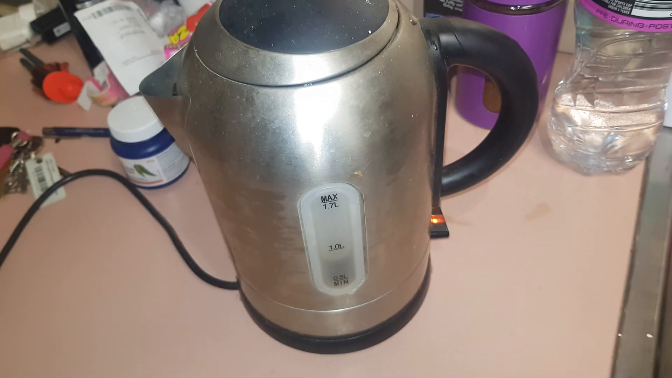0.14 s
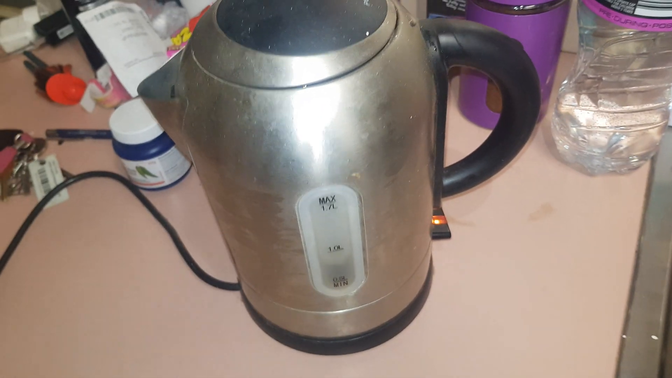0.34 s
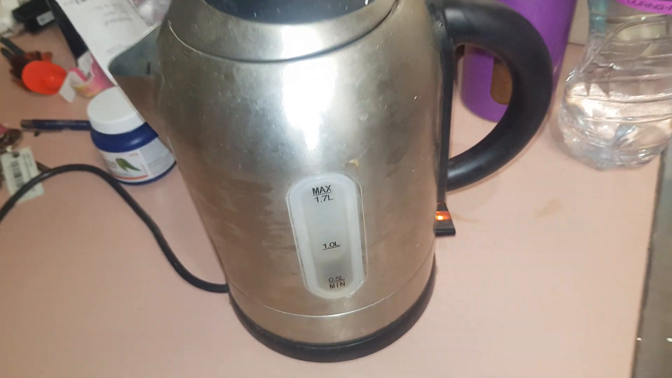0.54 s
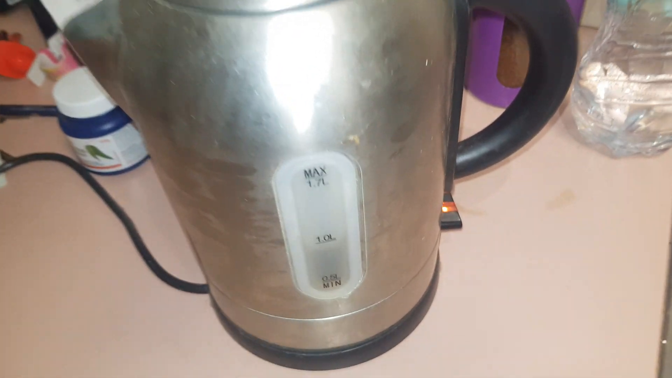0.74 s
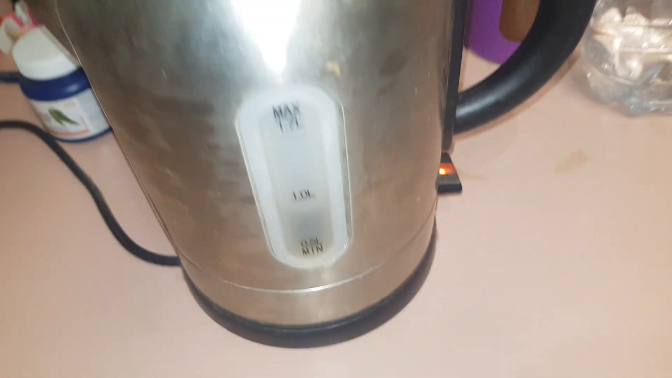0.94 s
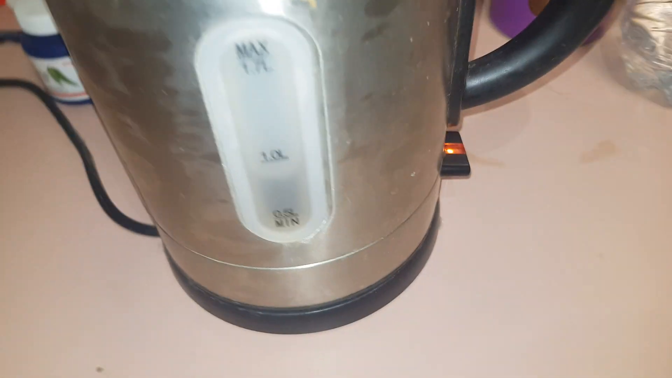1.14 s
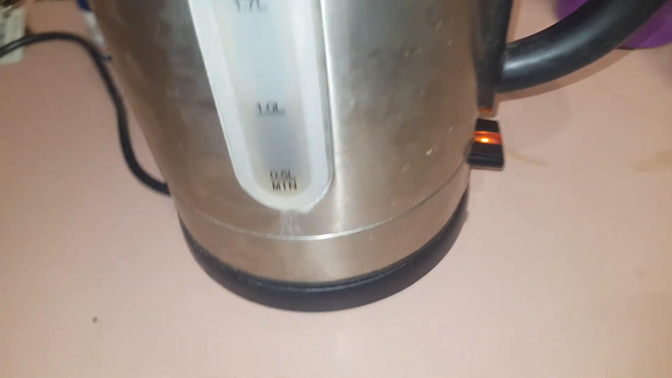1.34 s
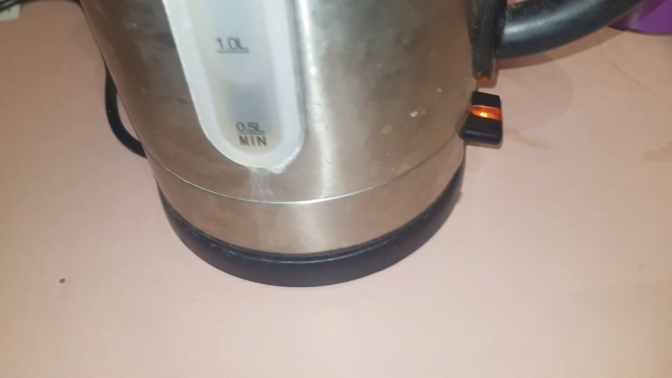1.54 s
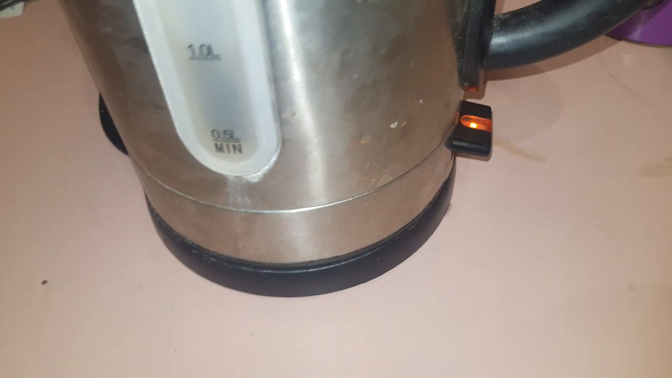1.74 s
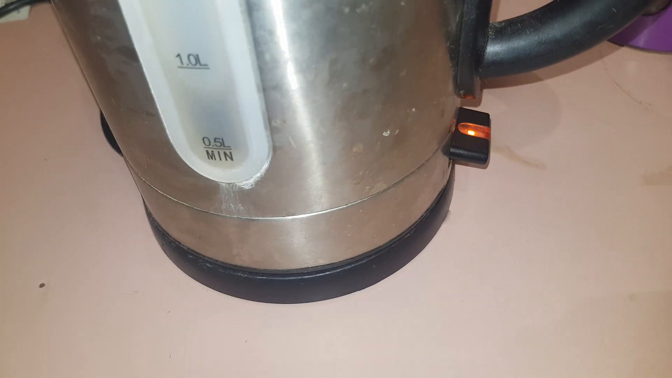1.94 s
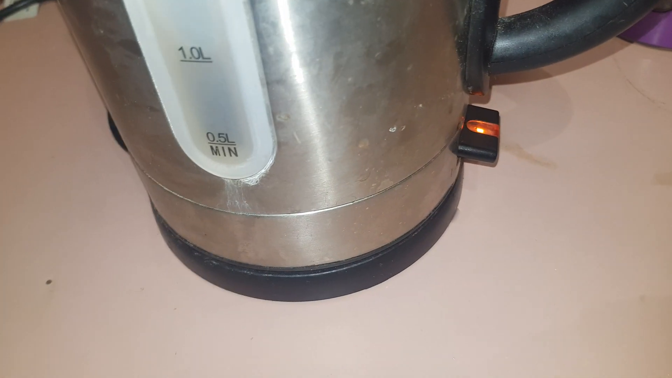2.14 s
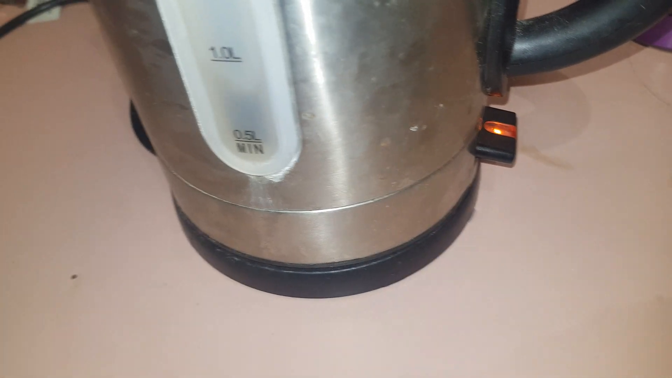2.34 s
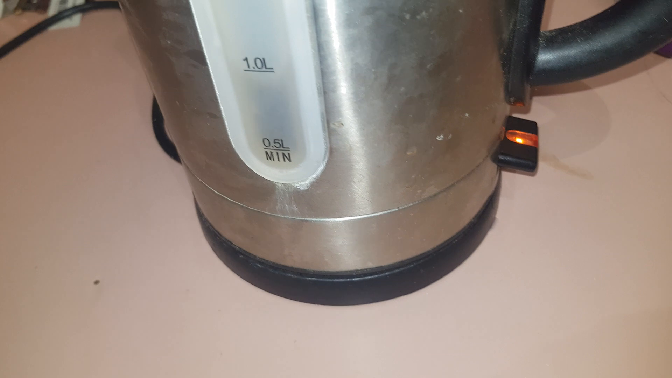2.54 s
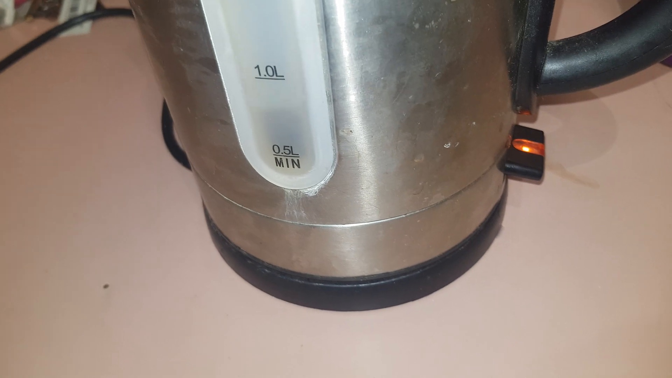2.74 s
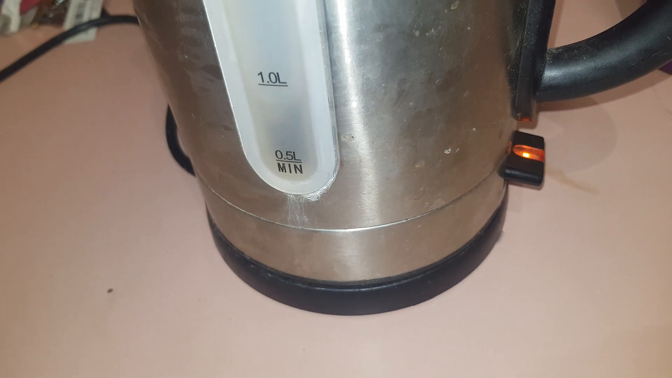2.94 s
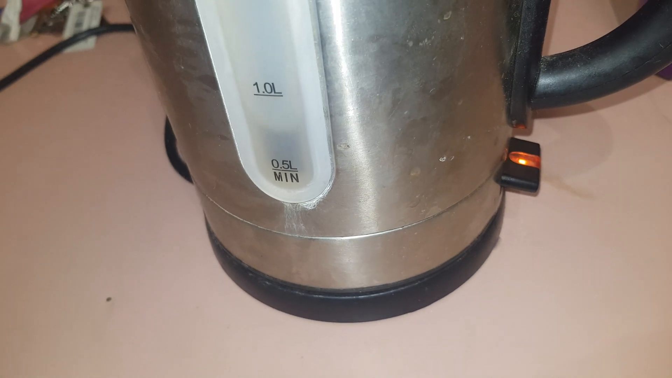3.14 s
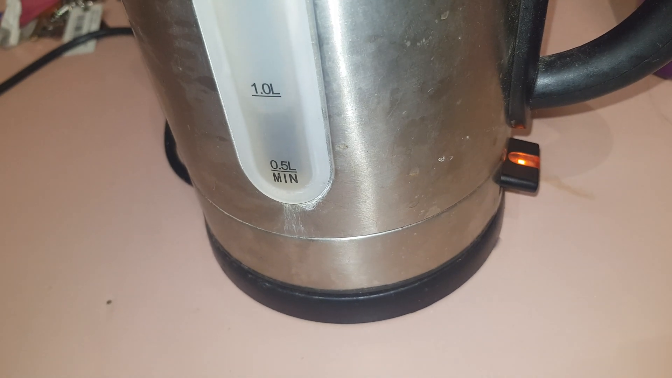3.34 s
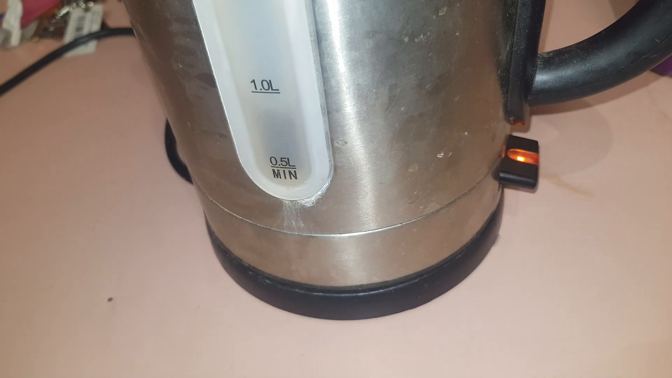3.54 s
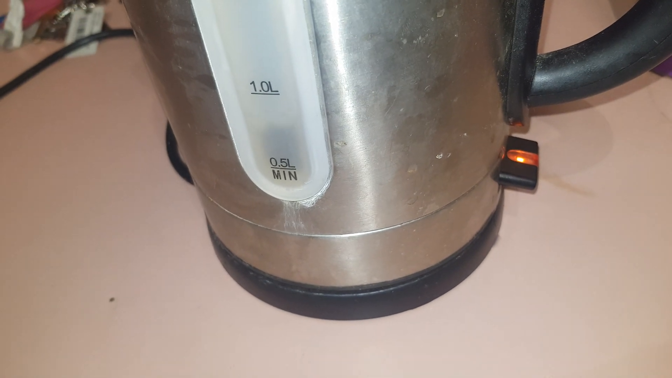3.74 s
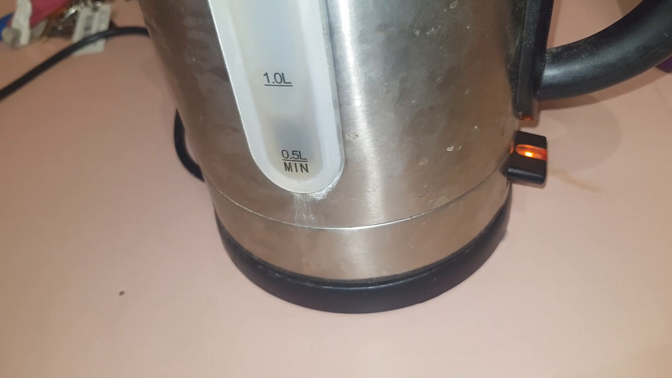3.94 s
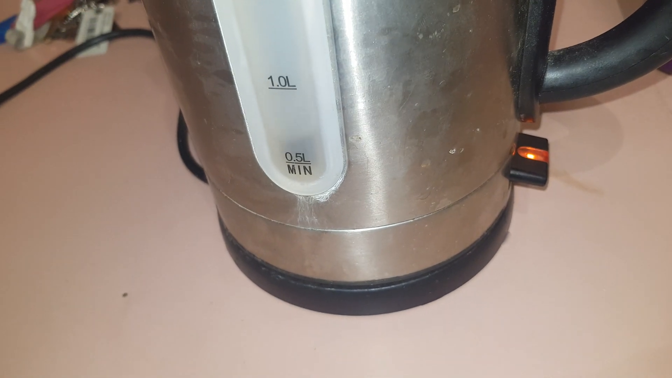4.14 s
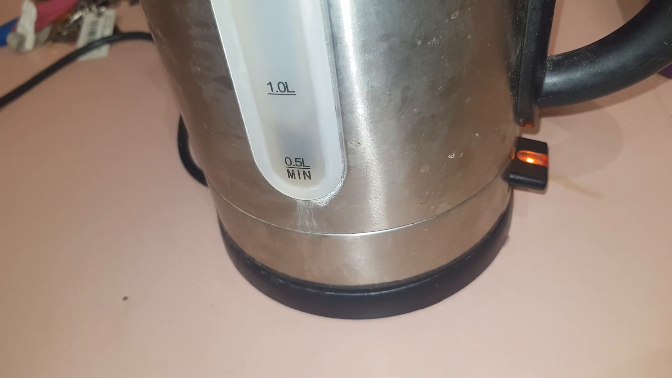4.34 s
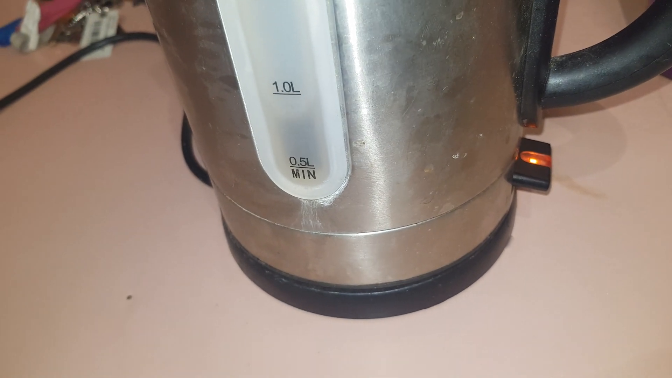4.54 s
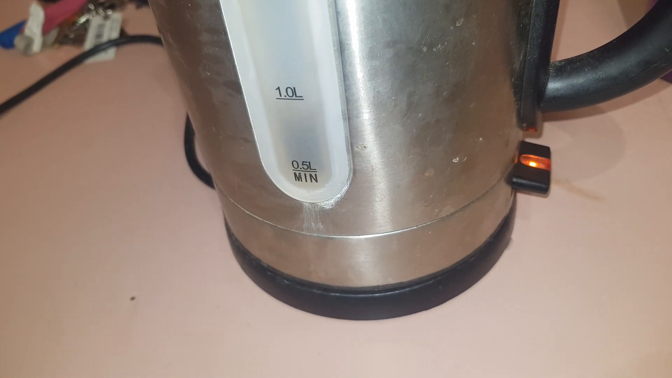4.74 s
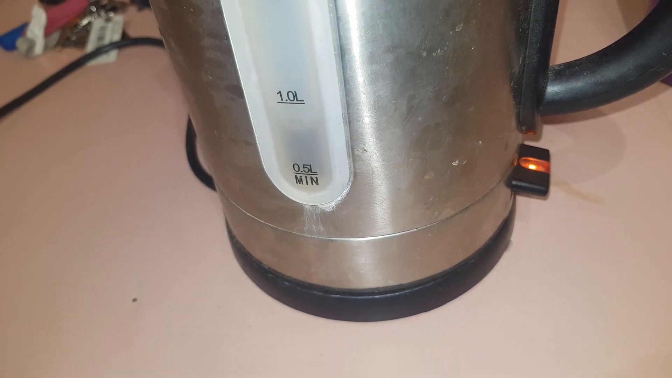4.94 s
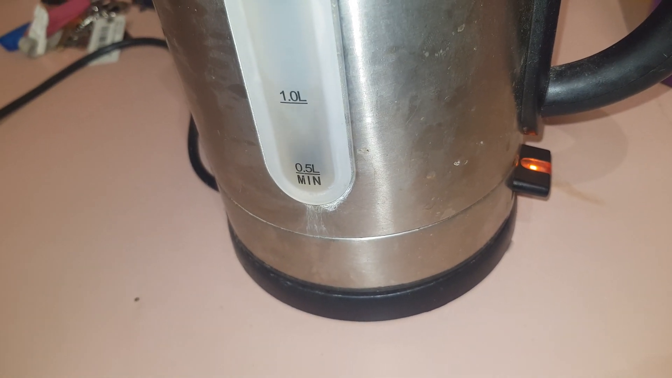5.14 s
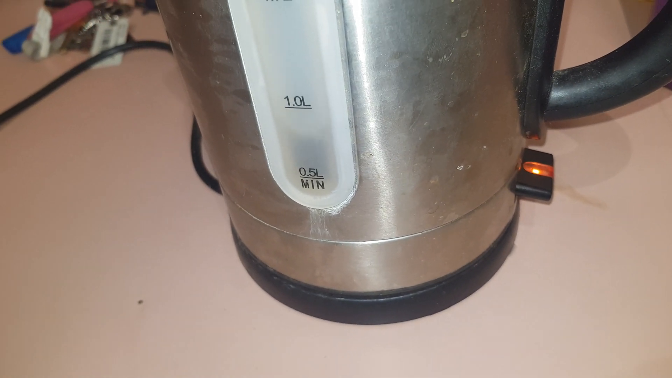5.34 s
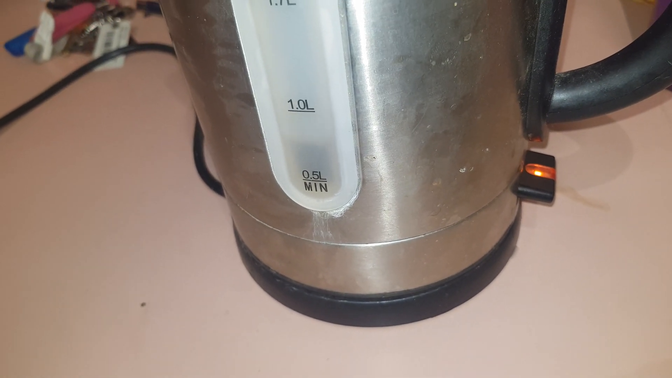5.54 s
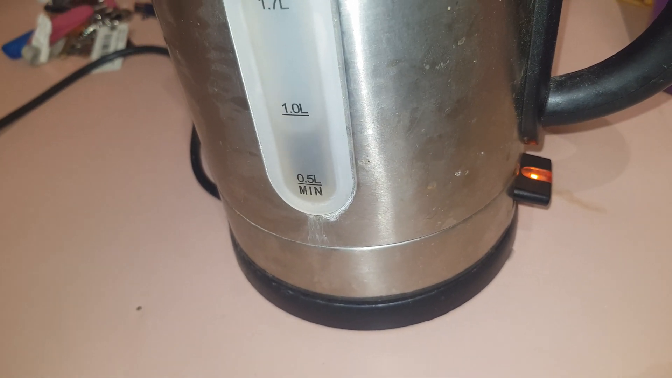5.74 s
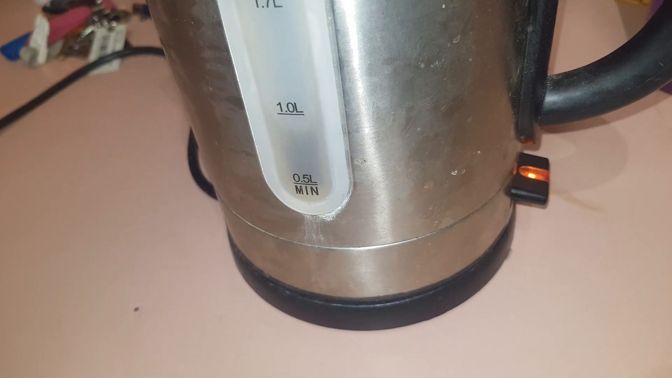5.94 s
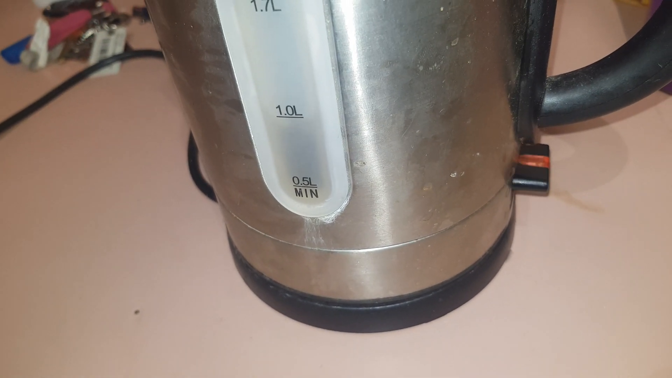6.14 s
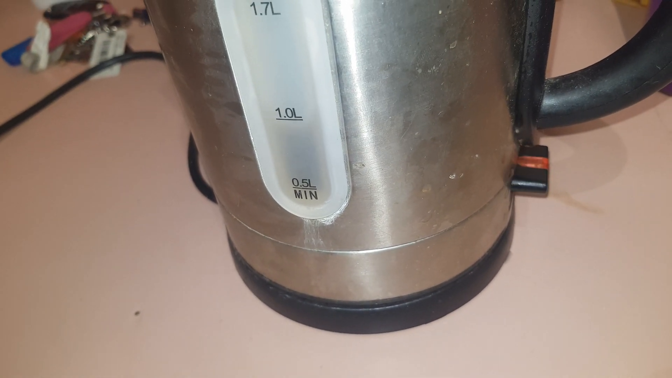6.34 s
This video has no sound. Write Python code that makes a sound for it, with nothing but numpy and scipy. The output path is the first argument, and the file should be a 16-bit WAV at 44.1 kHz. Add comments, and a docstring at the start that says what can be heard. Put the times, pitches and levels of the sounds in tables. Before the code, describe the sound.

In a small kitchen, a steel electric kettle is at a full rolling boil. A low, uneven rumble heaves under wet glugs, gurgles, fine crackle and bubble knocks on the metal wall, with a thin steady steam hiss. The microphone moves in close early on, bringing out the drumming of the wall. Near the end the switch snaps off loudly with a dull thud and brief metallic ring, while the bubbling continues.

```python
"""A small kitchen: a steel electric kettle at a rolling boil on the counter; the microphone soon moves in close.
Vapour bubbles, as random kicks through resonances, heave the water and drum on the body.
Chirped sines gurgle and glug, short noises crackle and knock on the wall, shaped noise is the steam.
Near the end the thermostat snaps the switch off: hard contacts, a lever ring, a thud, a brief shell ring.
A tail of dying noise is the kitchen's answer; two microphone ports hear it all."""
import sys
import numpy as np
from scipy import signal
from scipy.fft import rfft, irfft, next_fast_len
from scipy.io import wavfile
from scipy.ndimage import map_coordinates

SR = 44100
rng = np.random.default_rng(int(sys.argv[2]) if len(sys.argv) > 2 else 0)


def put_to_file(sound):
    """Save the sound as 16-bit audio at rate SR, in the file named by the first command-line argument."""
    columns = np.atleast_2d(sound).T  # one column per channel
    safe = np.clip(columns, -1, 1)
    whole_steps = np.round(safe * 32767)
    wavfile.write(sys.argv[1], SR, whole_steps.astype(np.int16))


N = 285768

# Colours give a relative spectrum: only their shape counts. Event levels are before colour, room and ports.
# kitchen, decay of the tail: (f/Hz, t60/s)
ROOM_DECAY = [(150, 0.055), (1000, 0.61), (2500, 0.44), (6000, 0.6), (15000, 0.18)]
# ports, likeness of left and right, held within -1 to 1: (f/Hz, likeness)
KETTLE_LIKENESS = [(90, 1.5), (260, 0.67), (520, 2), (800, 0.5), (1450, 0.5), (1900, 0), (2400, 0.32),
                   (4000, -0.06), (15000, 0)]
SWITCH_LIKENESS = [(200, 0.71), (700, 0.77), (1400, 0), (2300, 0.16), (4000, 0), (7000, 0)]
# ports, left minus right: (f/Hz, level/dB)
KETTLE_BALANCE = [(60, 9.5), (180, 7.5), (350, 10), (450, 10), (540, 12.5), (750, 6), (1100, 6.5),
                  (1600, 6), (2200, -2), (3000, 5.5), (3800, 1), (5500, 5.5), (7500, 13.5), (9000, 0.5),
                  (11000, 1), (14000, 7.5)]
SWITCH_SIDE_BALANCE = [(200, 6), (700, 11.5), (1300, 5), (2200, 0.5), (3200, 1), (4200, -1), (7200, 12),
                       (9000, 1), (14000, 4)]

# colour of the thin steam: (f/Hz, level/dB)
STEAM_COLOUR = [(100, 6), (1000, 11), (2500, 8), (4000, 5), (5500, -2), (7200, -5), (8500, -4), (11000, 2),
                (13000, -3), (15500, -7)]
# puffs of steam from the spout: (peak t/s, length/s, level/dB)
STEAM_PUFFS = [(.69, .5, -54.3), (1.017, 0.32, -55.3), (1.22, 0.42, -53.8)]
# colour of the puffs: (f/Hz, level/dB)
PUFF_COLOUR = [(1500, -14), (4500, 1.5), (7500, -1.5), (11000, 3), (14500, 0), (15800, 7.5)]
# thin ticks of the hot casing: (t/s, level/dB)
CASING_TICKS = [(0.4444, -40.5), (1.0502, -35.5), (2.1044, -32), (2.3101, -39), (2.5162, -45),
                (2.8844, -40), (3.3169, -43), (4.1965, -42.5), (5.503, -42), (5.5638, -39), (5.6111, -39)]
# colour of the ticks: (f/Hz, level/dB)
TICK_COLOUR = [(500, -4), (2500, 4), (5000, 2.5), (8000, 0.5), (11000, 4), (15500, -6)]

# the switch lets go, hits its stop and rattles: (t/s, level/dB, treble re that/dB, lever ring/dB)
SWITCH_CONTACTS = [(6.1113, -19, 2, -32), (6.1139, -14, -3, -28), (6.1222, -10, -2.5, -12),
                   (6.1243, -11.5, -1.5, -12.5), (6.127, -15.5, 0, -27), (6.1468, -22.5, -7, -21),
                   (6.1565, -28, -4, -30)]
# colour of the snap: (f/Hz, level/dB)
SNAP_COLOUR = [(80, -11), (300, -9.5), (500, -4), (700, 0), (980, -6), (1250, -1), (1520, 1.5),
               (1750, -1.5), (2000, 0.5), (2300, 6.5), (2600, 2.5), (2950, -2), (3300, -6), (4100, -3),
               (4800, -8), (5500, -13), (6400, -15), (7050, -10), (7600, -11.5), (10000, -10), (11400, -4),
               (13300, -9.5), (15300, -9), (15900, -22)]
# colour of the thud: (f/Hz, level/dB)
THUD_COLOUR = [(50, -6), (90, 9.5), (200, -20), (330, 2), (550, -6.5), (900, -18), (2500, -60)]
# short, hard ring of the plastic lever: (f/Hz, level/dB, t60/s)
LEVER_MODES = [(2290, -1.5, .012), (3240, -11, .01), (3850, -6, .009), (7070, -17, .02), (11300, -18, .016)]
# ring of the steel shell: (f/Hz, level/dB, t60/s)
SHELL_MODES = [(442, -35.5, .35), (729, -34, .3), (890, -39, .2), (1290, -38, .18), (1455, -31, 0.19),
               (1735, -36, 0.22), (2120, -33, .17), (2200, -30.5, .19), (2380, -35, .25), (2460, -37, .25),
               (3160, -40, .22), (3256, -38, .17)]

# strength of the boil about its usual; each layer takes a share of it: (t/s, level/dB)
BOIL_STRENGTH = [(0, -2), (1.0, -1.5), (1.3, 0.5), (1.9, -0.5), (2.95, 2.5), (3.12, -1.5), (3.45, 4.5),
                 (3.85, -0.5), (4.45, 2.5), (4.8, -4.5), (5.1, 0), (5.6, -2), (6.48, -2)]
# colour of the crackle: (f/Hz, level/dB)
CRACKLE_COLOUR = [(300, -26), (700, 3.5), (1150, -3), (1480, -3), (1950, -2.5), (2300, 1.5), (2800, -13),
                  (3800, -27), (5000, -19), (7200, -56), (9000, -25), (15500, -22)]
# the wall's ring in the crackle, heard only up close: (f/Hz, width/Hz, level/dB)
CLOSE_WALL_MODE = [(1500, 430, -2.5)]
# colour of the sparse, brighter spits: (f/Hz, level/dB)
SPIT_COLOUR = [(800, -6.5), (2400, 9.5), (4000, 3.5), (5500, -9.0), (7300, -7.5), (9000, -9), (15000, -7.5)]
# big bubbles bursting on the wall: (t/s, level/dB, f/Hz, sharp edge re that/dB)
WALL_POPS = [(0.3254, -39, 2420, -7), (0.572, -39, 2300, -26), (0.588, -39, 2900, -24),
             (1.066, -37, 1490, -26), (1.259, -37.5, 1450, -31), (1.3743, -33.5, 2330, -15),
             (1.4293, -46, 1440, -30), (1.483, -39, 2300, -32), (1.54, -39, 1900, -30),
             (1.578, -41, 1350, -30), (1.609, -41, 1700, -28), (1.647, -36, 1490, -18),
             (1.7683, -33, 3120, -12), (1.802, -44, 3200, -8), (1.948, -37, 2480, -26),
             (2.074, -35, 1300, -14), (2.2712, -40, 1470, -26), (2.294, -29, 1310, -26),
             (2.3386, -43, 2330, -28), (2.3527, -31.5, 2320, -30), (2.385, -38, 1500, -28),
             (2.565, -33.5, 2250, -16), (2.7583, -38, 1730, -26), (2.7893, -36, 1190, -14),
             (2.9996, -36.5, 1420, -12), (3.044, -33, 2190, -31), (3.123, -37, 1640, -10),
             (3.2814, -36, 1690, -8), (3.316, -35, 1620, -22), (3.753, -35, 1500, -26),
             (3.8144, -31, 3040, -12), (3.872, -35, 2300, -28), (3.902, -36.5, 2380, -24),
             (3.91, -35.5, 2750, -24), (4.0771, -38, 1710, -26), (4.197, -31.5, 1280, -19),
             (4.217, -40, 2600, -26), (4.233, -39, 2800, -22), (4.2488, -31.5, 2100, -28),
             (4.265, -35, 1400, -30), (4.337, -36.5, 2830, -3), (4.454, -31.5, 1710, -9.5),
             (4.615, -31.5, 2650, -18), (4.733, -33.5, 1880, -30), (4.762, -29, 1460, -36),
             (4.801, -32.5, 1800, -33), (4.8375, -35.5, 1780, -26), (4.9136, -35, 1700, -26),
             (4.9835, -35, 1510, -17), (5.002, -31, 2700, -18), (5.0062, -38, 1400, -4),
             (5.1026, -31, 1700, -25), (5.1413, -37, 1610, -6.5), (5.194, -36, 2200, -28),
             (5.232, -31.5, 1490, -31), (5.253, -36.5, 1500, -28), (5.3258, -34.5, 1600, -24),
             (5.371, -38, 1770, -30), (5.43, -35.5, 2500, -13), (5.56, -28.5, 1490, -25),
             (5.7884, -40, 1340, -26), (5.913, -37, 1410, -8), (6.0916, -39, 2370, -28),
             (6.327, -32, 2480, -15)]
# colour of a bubble's knock on the wall: (f/Hz, level/dB)
KNOCK_COLOUR = [(300, -33), (700, -7), (1100, 0), (1650, 4), (2000, -0.5), (2350, 2), (2900, -7),
                (4000, -13), (4800, -20), (7000, -36), (15000, -36)]
# colour of the sharp edges: (f/Hz, level/dB)
EDGE_COLOUR = [(1500, -4.0), (3800, -1), (5200, -10.0), (7300, -10), (8600, -21), (15000, -27)]
# colour of the gurgle and of the splashes: (f/Hz, level/dB)
GURGLE_COLOUR = [(150, -10.5), (300, -4.5), (540, -2.5), (660, -7.5), (850, -8), (1100, -12.5), (1600, -11),
                 (3000, -39.5)]
# large bubbles breaking the surface: (t/s, level/dB, starting f/Hz)
SURFACE_GLUGS = [(0.279, -38, 483), (0.671, -31.5, 560), (0.723, -35, 566), (1.315, -29.5, 495),
                 (1.583, -30, 236), (1.697, -25, 243), (2.004, -29.5, 529), (2.072, -35, 547),
                 (2.756, -33, 556), (2.9, -26, 240), (3.006, -23.5, 234), (3.437, -26.5, 246),
                 (3.815, -37, 564), (4.114, -23.5, 243), (4.318, -24.5, 260), (4.6, -26, 235),
                 (4.8, -31.5, 503), (4.894, -27, 490), (5.022, -25.5, 260), (5.166, -24, 266),
                 (5.669, -30.5, 550), (5.684, -26, 301), (6.033, -22, 259)]
# large pockets of vapour that rock the water: (peak t/s, level/dB, f/Hz)
VAPOUR_SURGES = [(0.03, -28.5, 143), (0.29, -29.5, 131.5), (0.429, -27.5, 133.3), (0.8, -34, 110),
                 (0.981, -31.5, 133.5), (1.189, -27, 133), (1.31, -24.5, 169.3), (1.51, -26.5, 168.8),
                 (1.7, -22.5, 176), (1.86, -30, 126.4), (2.051, -24, 137), (2.16, -28, 107.4),
                 (2.31, -26, 132), (2.53, -27.5, 123.8), (2.72, -29.0, 130.6), (2.84, -26, 113),
                 (2.989, -24, 175.2), (3.231, -29.0, 110), (3.5, -27, 130.5), (3.721, -28, 121),
                 (3.979, -22.5, 127.8), (4.191, -27.5, 170), (4.4, -23, 109.3), (4.53, -25, 175),
                 (5.021, -28, 135.5), (5.411, -33, 130.4), (5.5, -30.0, 166.4), (5.77, -31.0, 111),
                 (5.91, -26.5, 113.7), (6.019, -31, 132), (6.099, -30.5, 130.6), (6.31, -27.5, 175.8)]
# colour of the churn in a surge: (f/Hz, level/dB)
CHURN_COLOUR = [(60, -28), (105, 1.5), (180, -1.5), (280, -9.5), (450, -30), (1500, -76)]
# low resonances of the filled kettle on the counter: (f/Hz, width/Hz, level/dB)
BODY_MODES = [(61, 23.5, -5), (88.3, 16.5, -7.5), (112, 15.7, 0), (137.4, 13.2, 0.5), (175.3, 15.7, 1)]
# resonances of the water-loaded wall: (f/Hz, width/Hz, level/dB)
WALL_MODES = [(224.9, 17.7, 0.5), (278.4, 19.5, -1.5), (342, 27.6, -8.5), (456.7, 11.9, -5),
              (506, 50, -11.5), (567.3, 40.5, -10.5)]
# colours laid over the ringing body and the ringing wall: (f/Hz, level/dB)
HEAVE_COLOUR = [(20, -13), (36, -19.5), (50, -1), (180, -5.0), (260, -22.5), (1000, -34.5)]
DRUM_COLOUR = [(80, -14.0), (200, 0.0), (600, -3.5), (1000, 0.5), (3000, -38.5)]

TOP_HZ = 15850  # band limit of the recorder
APPROACH_START_S, APPROACH_S = 0.52, 0.94  # the microphone moves in: start and length
PING_S, PING_DB, PING_HZ = 0.047, -42, 1690
STOP_S = 6.1225  # the lever hits its stop
THUD_S, THUD_DB = 6.138, -22  # the kettle thuds on its base; level before colour and room
SURGE_S = 0.125  # length of one surge
GLUG_CYCLES = 18.2  # a large bubble falls 60 dB in this many cycles of its starting pitch


def amp(db):
    """Decibels to gain."""
    return 10 ** (np.asarray(db) / 20)


def unit(x):
    """Scale to rms 1."""
    return x / np.sqrt(np.mean(x ** 2) + 1e-20)


def along(points, hz):
    """Read (Hz, value) points on a log frequency axis."""
    f, v = np.transpose(points)
    return np.interp(np.log(hz + 1), np.log(f), v)


def wobble(rate):
    """A smooth random curve with rate knots a second."""
    knots = rng.standard_normal(int(N * rate / SR) + 4)
    return map_coordinates(knots, [np.arange(N) * rate / SR])


def add(track, s, sound):
    """Mix a sound into a track at time s."""
    part = track[..., round(s * SR):][..., :sound.shape[-1]]
    part += sound[..., :part.shape[-1]]


def filtered(x, response):
    """Multiply the spectrum of x by a complex response of frequency."""
    size = 2 * next_fast_len(N // 2 + SR // 4)
    return irfft(rfft(x, size) * response(np.fft.rfftfreq(size, 1 / SR)), size)[..., :N]


def coloured(x, points):
    """Causal filter with the given spectrum; white noise keeps its power."""
    def response(hz):
        cepstrum = irfft(np.log(unit(amp(along(points, hz)))))
        half = len(cepstrum) // 2
        # fold the cepstrum forward in time: minimum phase
        cepstrum[1:half] *= 2
        cepstrum[half + 1:] = 0
        return np.exp(rfft(cepstrum))
    return filtered(x, response)


def resonances(x, modes):
    """Ring x through a set of damped modes with alternating sign."""
    def response(f):
        total = 0
        for k, (centre, width, db) in enumerate(modes):
            damping = 1j * f * width
            total = total + (-1) ** k * amp(db) * damping / (centre * centre - f * f + damping)
        return total
    return filtered(x, response)


def burst(t60):
    """A pair of short dying noises: one contact, scattered by nearby surfaces."""
    t = np.arange(SR // 8) / SR
    return rng.standard_normal((2, len(t))) * amp(-60 * t / t60)


def contact(t60):
    """A pair of hard contacts: dying noises flattened to an even spectrum, then damped a little more."""
    noise = burst(t60)
    flat = irfft(np.exp(1j * np.angle(rfft(noise))))
    t = np.arange(flat.shape[1]) / SR
    return flat * np.linalg.norm(noise[0]) * amp(-20 * t / t60)


def impulses(rate, spread_db):
    """Random kicks, on average rate a second, of either sign and log-normal size, clipped at two spreads."""
    struck = rng.random(N) < rate / SR
    sign = rng.choice([-1, 1], N)
    size = amp(spread_db * np.clip(rng.standard_normal(N), -2, 2))
    return struck * sign * size


def blip(hz, rise, t60):
    """One ring at the two ports: a soft start, then a pitch that climbs at a steady rate set by rise."""
    t = np.arange(SR // 8) / SR
    phase = rng.uniform(0, 2 * np.pi, (2, 1))
    tone = np.sin(2 * np.pi * hz * t * (1 + rise * t / 2) + phase)
    return tone * amp(-60 * t / t60) * (1 - np.exp(-t / 0.00031))


def bubbles(count, centre_hz, cycles, rise, spread_db):
    """Each bubble rings for a few cycles and rises in pitch as it nears the surface."""
    start = rng.integers(0, N, (count, 1))
    pitch, size = np.clip(rng.standard_normal((count, 2)), -2, 2).T[:, :, None]
    hz = centre_hz * np.exp(.5 * pitch)
    n = np.arange(SR // 25)
    age = hz * n / SR / cycles  # 1 when the ring has fallen 60 dB
    tone = np.sin(2 * np.pi * cycles * age * (1 + rise * age / 2))
    ring = tone * amp(-60 * age) * (1 - np.exp(-25 * age))
    return np.bincount((start + n).ravel(), (amp(spread_db * size) * ring).ravel(), N)[:N]


def nearness():
    """0 while the microphone is far, 1 once it is close; the move starts and ends gently."""
    progress = np.clip((np.arange(N) / SR - APPROACH_START_S) / APPROACH_S, 0, 1)
    return (1 - np.cos(np.pi * progress)) / 2


def level(close_db, far_db, follows, surge_db, surge_rate):
    """A layer's dB: glides from far to close, takes a share of the boil's strength and wavers by chance."""
    t, db = np.transpose(BOIL_STRENGTH)
    strength_db = np.interp(np.arange(N) / SR, t, db)
    distance_db = far_db + (close_db - far_db) * nearness()
    return distance_db + follows * strength_db + surge_db * wobble(surge_rate)


def kitchen(x, wet_db):
    """Direct sound plus the room's tail, in which each frequency dies at its own speed."""
    hz, t, z = signal.stft(rng.standard_normal((2, SR // 2)), SR, nperseg=256)
    decay = amp(-60 * t / along(ROOM_DECAY, hz)[:, None])
    tail = signal.istft(z * decay, SR, nperseg=256)[1]
    tail = np.pad(tail, ((0, 0), (SR // 250, 0)))  # the tail starts 4 ms late
    return x + amp(wet_db) * signal.fftconvolve(x, tail / np.linalg.norm(tail[0]), axes=1)[:, :N]


def ports(pair, alike, balance):
    """Mix two unrelated signals into left and right with a likeness and a level balance at each frequency."""
    def spread(hz):
        turn = np.arccos(np.clip(along(alike, hz), -1, 1)) / 2
        return np.array([np.cos(turn), np.sin(turn)])

    def tilt(hz):
        return amp(np.outer([1, -1], along(balance, hz)) / 2)
    mid, side = filtered(pair, spread)
    return filtered(np.array([mid + side, mid - side]), tilt)


def steam():
    """A thin, even hiss: coloured noise at a fixed level."""
    return amp(-53.5) * unit(coloured(rng.standard_normal((2, N)), STEAM_COLOUR))


def air():
    """Each puff of steam is bright noise that swells and fades smoothly, with a quick flutter in level."""
    swell = np.zeros(N)
    for s, length_s, db in STEAM_PUFFS:
        phase = np.clip((np.arange(N) / SR - s) / length_s, -.5, .5)
        swell += amp(db) * np.cos(np.pi * phase) ** 2
    flutter = amp(1.0 * wobble(27.0))
    return swell * flutter * unit(coloured(rng.standard_normal((2, N)), PUFF_COLOUR))


def ping():
    """One faint, clear, steady note rings briefly."""
    pair = np.zeros((2, N))
    add(pair, PING_S, amp(PING_DB) * blip(PING_HZ, rise=0, t60=0.13))
    return kitchen(pair, wet_db=-13)


def ticks():
    """The hot casing gives small, dry, bright ticks: coloured hard contacts."""
    pair = np.zeros((2, N))
    for s, db in CASING_TICKS:
        add(pair, s, amp(db - 1.5) * contact(t60=0.022))
    return kitchen(coloured(pair, TICK_COLOUR), wet_db=-9.0)


def lever():
    """Every contact makes the lever itself ring for a few milliseconds, straight into both ports."""
    track, t = np.zeros(N), np.arange(SR // 20) / SR
    ring = sum(amp(db - 60 * t / t60) * np.sin(2 * np.pi * hz * t) for hz, db, t60 in LEVER_MODES)
    for s, _, _, ring_db in SWITCH_CONTACTS:
        add(track, s, amp(ring_db) * ring)
    return track


def shell():
    """The lever's stop sets the steel shell ringing; each mode reaches the two ports a little out of step."""
    pair, t = np.zeros((2, N)), np.arange(SR // 3) / SR
    for hz, db, t60 in SHELL_MODES:
        tone = np.sin(2 * np.pi * hz * t + rng.normal(0, .4, (2, 1)))
        add(pair, STOP_S, amp(db - 60 * t / t60) * tone)
    return pair * amp([[1.5], [-1.5]])  # left 3 dB over right


def switch():
    """Each lever contact cracks, scatters off the counter and drives the wall; the kettle thuds on its base."""
    cracks, treble, thud = np.zeros((3, 2, N))
    for s, db, treble_db, _ in SWITCH_CONTACTS:
        crack = amp(db) * (contact(t60=0.022) + amp(-14.0) * burst(t60=0.19))
        add(cracks, s, crack)
        add(treble, s, amp(treble_db) * crack)

    def low_share(hz):
        return 1 / (1 + (hz / 5500) ** 6)
    # each contact has its own treble level above 5500 Hz
    split = filtered(cracks, low_share) + filtered(treble, lambda hz: 1 - low_share(hz))
    snap = coloured(split, SNAP_COLOUR)
    add(thud, THUD_S, amp(THUD_DB) * burst(t60=0.075))
    thud = coloured(thud, THUD_COLOUR)
    return kitchen(snap + thud + amp(-2) * resonances(cracks, WALL_MODES), wet_db=-15.3)


def crackle(level_db):
    """Small bubbles burst in flurries; each patch of the wall answers in its own way, and some bubbles ping."""
    patches, spits = np.zeros((2, 2, N))
    flurry = amp(1.3 * wobble(16) + 1.0 * wobble(45))
    for _ in range(14):
        kicks = flurry * impulses(rate=28, spread_db=1.5)
        patches += signal.fftconvolve(kicks[None], burst(t60=0.016), axes=1)[:, :N]
    for _ in range(6):
        kicks = impulses(rate=6, spread_db=4.5)
        spits += signal.fftconvolve(kicks[None], burst(t60=0.025), axes=1)[:, :N]
    pings = np.array([bubbles(count=1800, centre_hz=2100, cycles=14, rise=0.11, spread_db=2.5)
                      for _ in range(2)])
    fizz = coloured(unit(patches) + amp(-7.0) * unit(pings), CRACKLE_COLOUR)
    fizz = fizz + nearness() * resonances(fizz, CLOSE_WALL_MODE)
    spits = coloured(spits, SPIT_COLOUR)
    return amp(level_db) * unit(kitchen(unit(fizz) + amp(-8.5) * unit(spits), wet_db=-5.0))


def pops():
    """Big bubbles knock on the wall, each with a ring of its own rising pitch and a softer or harder edge."""
    knocks, edges, rings = np.zeros((3, 2, N))
    for s, db, hz, edge_db in WALL_POPS:
        add(rings, s, amp(db - 1.5) * blip(hz, rise=4, t60=.016))
        add(knocks, s, amp(db - 4.5) * contact(t60=0.035))
        add(edges, s, amp(db + edge_db) * burst(t60=0.035))
    edges = coloured(edges, EDGE_COLOUR)
    return kitchen(coloured(knocks, KNOCK_COLOUR) + edges + rings, wet_db=-10.5)


def gurgle(level_db):
    """Open bubbles churn at the surface: many short rings at random times."""
    pair = np.array([bubbles(count=2400, centre_hz=633, cycles=6.9, rise=0.13, spread_db=6.0)
                     for _ in range(2)])
    return amp(level_db) * unit(kitchen(coloured(pair, GURGLE_COLOUR), wet_db=-3.0))


def glugs():
    """Large bubbles break the surface with a wet splash and a low blip; the lower, the longer."""
    rings, splashes = np.zeros((2, 2, N))
    for s, db, hz in SURFACE_GLUGS:
        add(rings, s, amp(db) * blip(hz, rise=3.5, t60=GLUG_CYCLES / hz))
        add(splashes, s, amp(db - 13.5) * burst(t60=0.014))
    return kitchen(rings + coloured(splashes, GURGLE_COLOUR), wet_db=-7.5)


def surges(churn_db):
    """A large pocket of vapour rocks the water: a low note and a churning noise swell and die together."""
    notes, swells = np.zeros((2, N)), np.zeros(N)
    t = np.arange(round(SURGE_S * SR)) / SR
    swell = np.sin(np.pi * t / SURGE_S) ** 2
    for s, db, hz in VAPOUR_SURGES:
        start = max(s - SURGE_S / 2, 0)
        tone = np.sin(2 * np.pi * hz * t + rng.uniform(0, 2 * np.pi, (2, 1)))
        add(notes, start, amp(db - 2.2) * swell * tone)
        add(swells, start, amp(db) * swell)
    churn = unit(coloured(rng.standard_normal((2, N)), CHURN_COLOUR))
    return notes + amp(churn_db) * swells * churn


def rumble(heave_db, drum_db):
    """Vapour bubbles swell and collapse: many heave the whole body, fewer and more uneven ones drum the wall."""
    pushes = np.array([impulses(rate=900, spread_db=0.5) for _ in range(2)])
    kicks = np.array([impulses(rate=220, spread_db=3.0) for _ in range(2)])
    heave = coloured(resonances(pushes, BODY_MODES), HEAVE_COLOUR)
    drum = coloured(resonances(kicks, WALL_MODES), DRUM_COLOUR)
    return amp(heave_db) * unit(heave) + amp(drum_db) * unit(drum)


def scene():
    """The boil, its steam and the switch, as they reach the two ports."""
    heave_db = level(close_db=-32.5, far_db=-32.7, follows=0.8, surge_db=0.25, surge_rate=6.2)
    drum_db = level(close_db=-38.0, far_db=-42.0, follows=0.37, surge_db=1.0, surge_rate=7)
    gurgle_db = level(close_db=-45.5, far_db=-43.5, follows=0.26, surge_db=0.6, surge_rate=6)
    crackle_db = level(close_db=-49.0, far_db=-51.6, follows=0.083, surge_db=0.5, surge_rate=5.78)
    background = steam() + air() + ping() + ticks()
    surface = crackle(crackle_db) + pops() + gurgle(gurgle_db) + glugs()
    depths = surges(churn_db=-11) + rumble(heave_db, drum_db)
    kettle = ports(background + surface + depths, KETTLE_LIKENESS, KETTLE_BALANCE)
    # the switch has its own likeness and balance, mostly louder on the left
    snap = ports(switch(), SWITCH_LIKENESS, SWITCH_SIDE_BALANCE)
    # lever and shell are added directly
    return kettle + snap + lever() + shell()


def record(dry):
    """The recorder keeps nothing above its band limit."""
    return filtered(dry, lambda hz: hz < TOP_HZ)


dry = scene()
out = record(dry)
put_to_file(out)
```